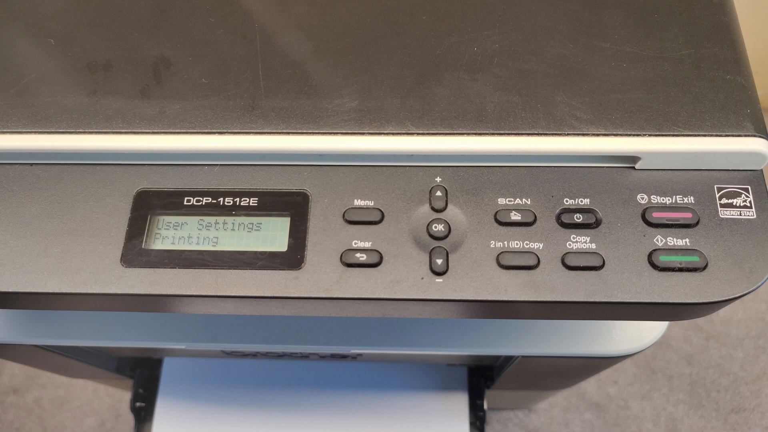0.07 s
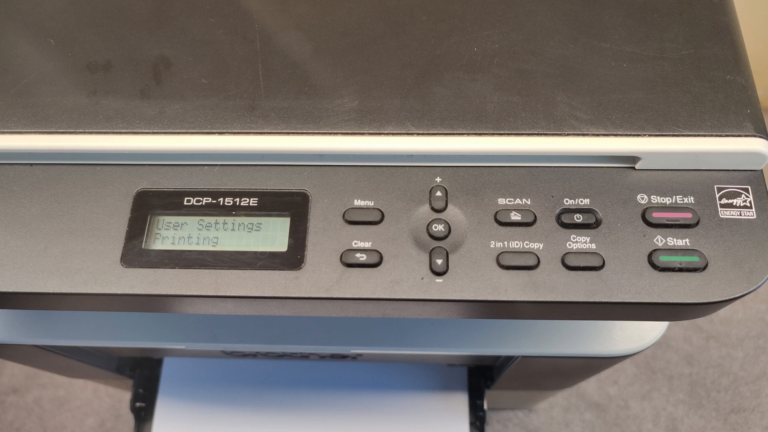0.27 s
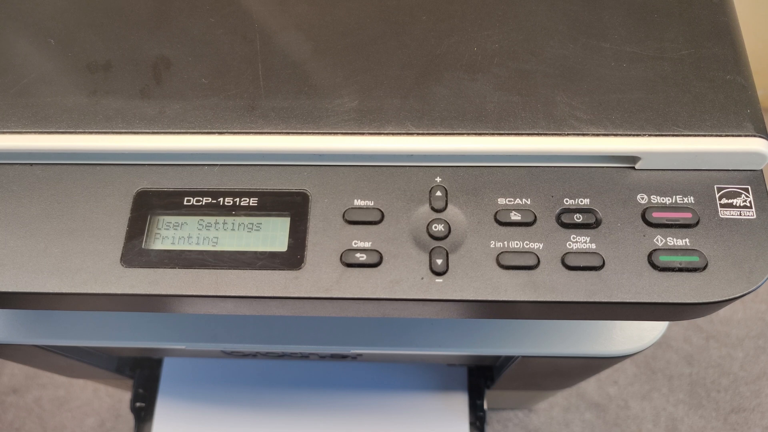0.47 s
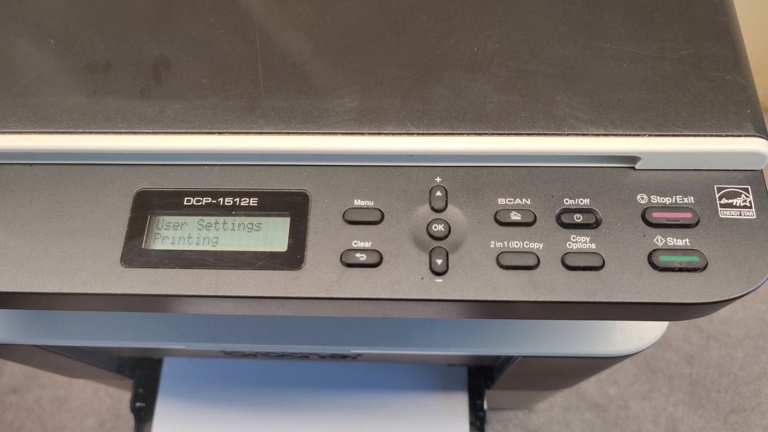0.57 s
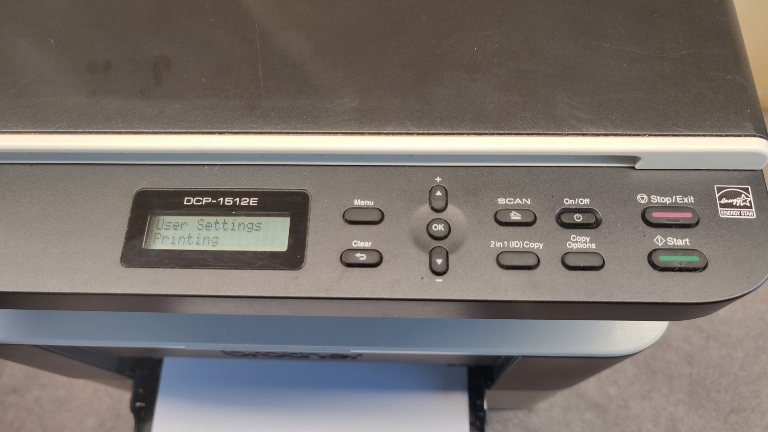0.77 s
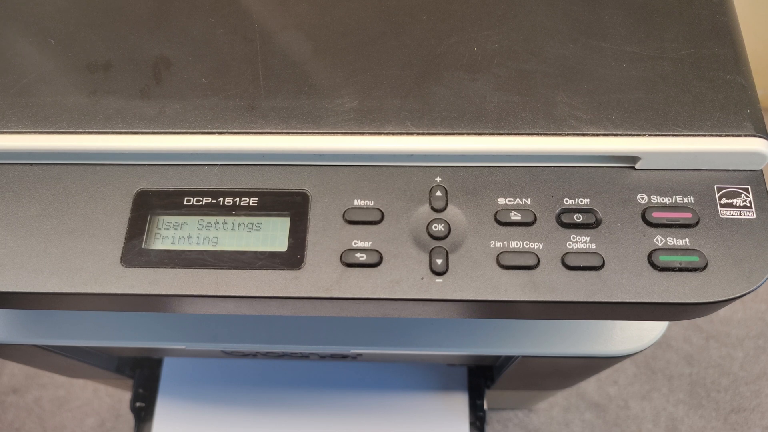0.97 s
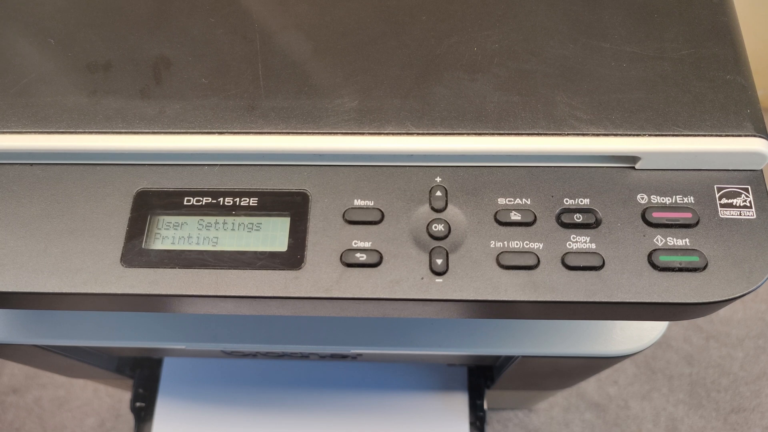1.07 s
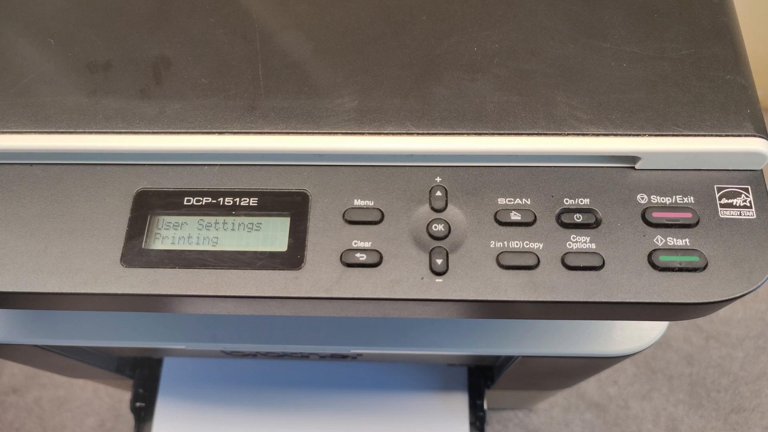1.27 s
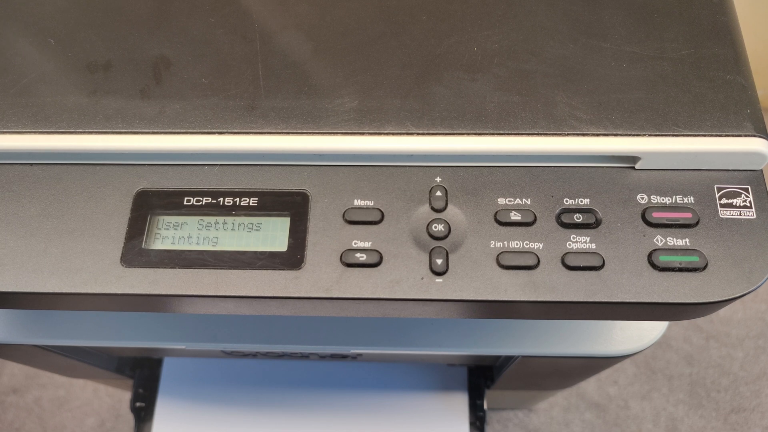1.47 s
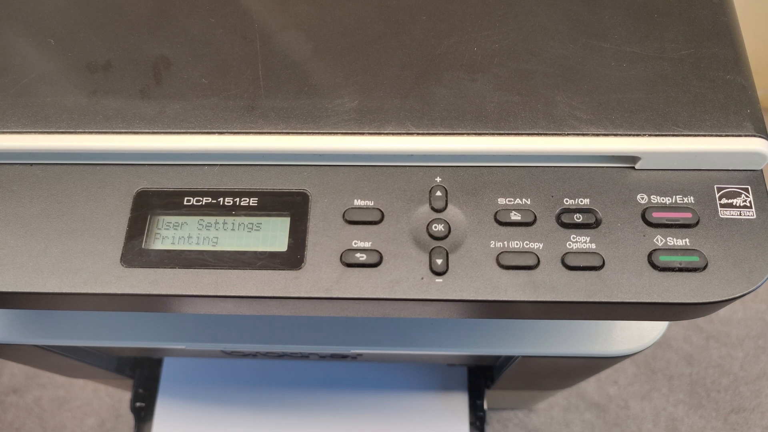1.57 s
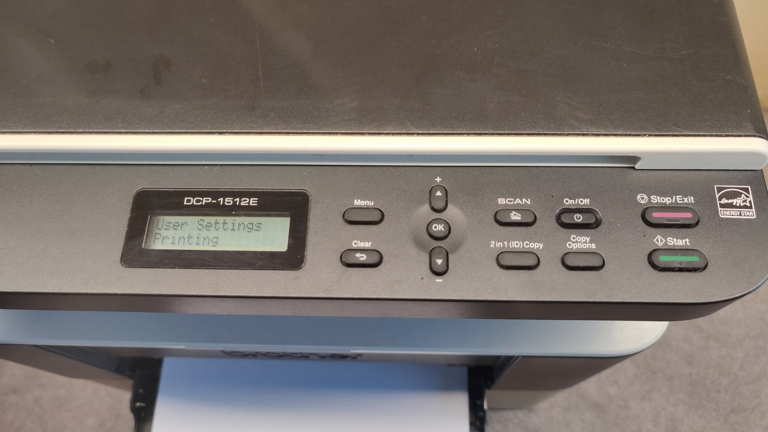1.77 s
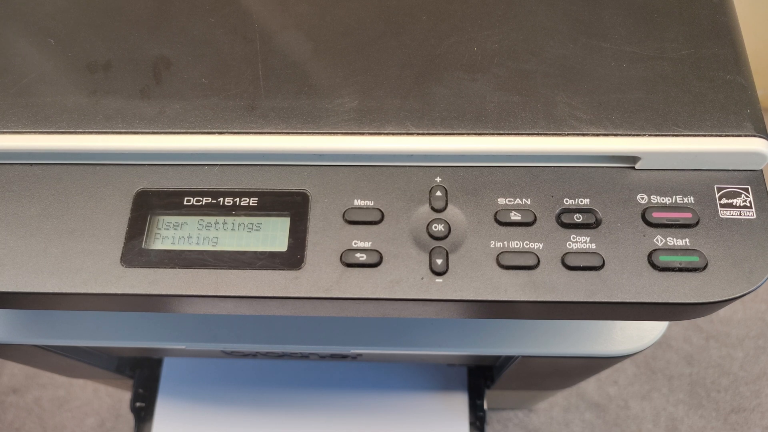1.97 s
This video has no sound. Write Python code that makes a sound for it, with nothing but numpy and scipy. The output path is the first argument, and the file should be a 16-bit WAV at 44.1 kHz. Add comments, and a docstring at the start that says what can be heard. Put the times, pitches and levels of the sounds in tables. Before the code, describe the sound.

After a brief quiet, a printer's mechanism clacks with soft low thuds, and its motor and gears quickly reach a wavering, surging whirr with papery roller rustle; a faint rising whine passes. Close stereo, small dry space.

```python
"""A quiet room, with the stereo microphone just above the panel of a laser printer as it wakes.
The drive engages with a plastic clack: noise cracks, ringing case modes and soft chassis thuds.
Its gears run up to a whirr of wavering, surging partials over the noise of rustling rollers.
Faintly behind, the mirror motor spins up in raspy partials that climb and fade out."""
import sys
import numpy as np
from scipy import signal
from scipy.fft import rfft, irfft
from scipy.io import wavfile

SR = 44100
rng = np.random.default_rng(int(sys.argv[2]) if len(sys.argv) > 2 else 0)


def to_wav(s):
    """Save 16-bit WAV."""
    ch = np.atleast_2d(s).T  # columns
    pcm = np.round(np.clip(ch, -1, 1) * 32767)  # PCM
    wavfile.write(sys.argv[1], SR, pcm.astype(np.int16))


N = 88552
T = np.arange(N) / SR
EDGE_HZ = 15480  # upper band limit of the recorder


def amp(db):
    """Decibels to gain."""
    return 10 ** (np.asarray(db) / 20)


def unit(x):
    """Scales to rms 1."""
    return x / np.sqrt(np.mean(abs(x) ** 2) + 1e-20)


def read(points, hz):
    """Reads a table on a log-frequency axis."""
    f, value = np.transpose(points)
    return np.interp(np.log(hz + 1), np.log(f + 1), value)


def curve(points, axis=1):
    """Reads one column of a table over time."""
    rows = np.array(points)
    return np.interp(T, rows[:, 0], rows[:, axis])


def drift(rate_hz):
    """Random wander of rms 1, weakening above the given rate."""
    f = np.fft.rfftfreq(N, 1 / SR)
    slowing = (f > 0) / (1 + (f / rate_hz) ** 2)
    return unit(irfft(rfft(rng.standard_normal(N)) * slowing, N))


# likeness of the two microphone sides: (frequency [Hz], left-right correlation [-1 to 1])
SIDE_LIKENESS = [(40, .97), (150, 0.9), (300, 0.9), (600, 0.65), (1300, 0), (2500, 0.04), (5000, 0),
                 (14000, 0)]
# lean of the stereo image: (frequency [Hz], left minus right [dB])
SIDE_LEAN = [(60, -1), (200, 1.5), (380, -1.5), (620, 2.5), (1000, -3.5), (1400, 2.5), (2500, 0.5),
             (4400, -2), (7000, -3.5), (8600, 5), (11000, -3), (14300, 3)]


def colour(pair, spectrum):
    """Gives two unrelated signals a spectrum and a frequency-dependent stereo image, at rms 1."""
    f = np.fft.rfftfreq(N, 1 / SR)
    a, b = rfft(pair)
    same = np.clip(read(SIDE_LIKENESS, f), -.99, .99)
    lean = read(SIDE_LEAN, f)
    left = a * amp(lean / 2)
    right = (same * a + np.sqrt(1 - same ** 2) * b) * amp(-lean / 2)
    return unit(irfft(np.array([left, right]) * amp(read(spectrum, f)), N))


def noise(spectrum):
    """Steady stereo noise of rms 1."""
    return colour(rng.standard_normal((2, N)), spectrum)


# spectrum of the quiet room: (frequency [Hz], relative density [dB per Hz])
ROOM_SPECTRUM = [(10, -31), (22, -6.5), (38, -17), (60, -4.5), (90, -17), (178, -22.5), (270, -14.5),
                 (377, -30.5), (480, -22), (750, -27.5), (950, -32.5), (2500, -41), (8000, -54.5),
                 (15000, -52)]
ROOM_DB = -57.5


def room_tone():
    """The room itself: steady noise, heaviest in the lows."""
    return amp(ROOM_DB) * noise(ROOM_SPECTRUM)


# spin-up of the mirror motor: (time [s], whine frequency [Hz])
MIRROR_SPIN_UP = [(.63, 1300), (.67, 2320), (.68, 2560), (.73, 3990), (.8, 5950), (.854, 7270), (.95, 9240),
                  (1.06, 11290), (1.164, 13120), (1.29, 15290), (1.45, 17700)]
# partials of the whine: (multiple of a sixth of the whine, level [dB], whine frequency at half entry [Hz])
MIRROR_PARTIALS = [(3, -4.5, 12600), (6, 0, 1800), (8, -14, 9000), (9, -7, 8500), (12, -4, 5500)]
# passage through the case: (frequency [Hz], level [dB], left minus right [dB])
CASE_PASSAGE = [(1700, -59, 0), (2150, -65, 0), (2380, -53.5, 0), (2520, -49, 0), (2750, -64, 0),
                (3300, -70, 0), (3900, -61, -3), (4700, -63.5, -3), (5400, -62.5, -3), (6300, -65, -4),
                (7150, -59.5, -8), (7700, -72, -2), (8200, -72, 0), (9000, -78, 0), (10500, -78, 0),
                (12000, -71, 2), (13400, -69, 0), (14200, -59, 6), (14700, -69, 3), (15400, -74, 0)]


def mirror(rasp=0.91, rasp_hz=160, swell_hz=1000, fade_s=0.12):
    """The mirror motor accelerates; its raspy partials flare as they cross the resonances of the case."""
    whine_hz, case, out = curve(MIRROR_SPIN_UP), np.array(CASE_PASSAGE), np.zeros((2, N))
    half_lean = np.array([[.5], [-.5]])
    for k, db, from_hz in MIRROR_PARTIALS:
        hz = whine_hz * k / 6
        below_edge = np.clip((EDGE_HZ - hz) / 200, 0, 1)
        entered = np.clip((whine_hz - from_hz) / swell_hz + .5, 0, 1)
        level_db = db + read(case[:, :2], hz) + half_lean * read(case[:, ::2], hz)
        grit = np.array([unit(1 + rasp * (drift(rasp_hz) + 1j * drift(rasp_hz))) for _ in range(2)])
        partial = (grit * np.exp(2j * np.pi * np.cumsum(hz) / SR)).real
        out += np.sqrt(2) * below_edge * entered * amp(level_db) * partial
    return out * np.clip((MIRROR_SPIN_UP[-1][0] - T) / fade_s, 0, 1)


START_S = .41


def running(rise_s=0.0054):
    """Fades in linearly as the drive starts."""
    return np.clip((T - START_S) / rise_s, 0, 1)


# lumpy whirr of the gear train: (frequency [Hz], relative density [dB per Hz])
WHIRR_SPECTRUM = [(30, -2.5), (70, -26), (105, 2.5), (140, -9.5), (260, -4), (350, -10), (450, -8),
                  (560, -6.5), (640, -0.5), (745, -16.5), (900, -8.5), (1250, -9.5), (1750, -19.5),
                  (3000, -29), (8000, -78)]
# rustle of the rollers: (frequency [Hz], relative density [dB per Hz])
RUSTLE_SPECTRUM = [(300, -31), (1200, -3.5), (2300, 1), (3400, -2), (4500, -2.5), (6200, -7.5),
                   (7250, -6.5), (8100, -18), (10500, -19.5), (12800, -16), (14200, -9), (15400, -25)]
# course of the load: (time [s], whirr and shaft hum level [dB], rustle level [dB])
LOAD_LEVEL = [(.46, 1, -1.5), (.53, 0, -2.5), (.6, -3, 1), (.8, -1, -0.5), (1.05, -1.5, -1),
              (1.35, -0.5, 0.5), (1.6, -0.5, 3), (1.78, -1.5, 4), (1.87, 1.5, 5.5), (2.0, 0.5, 6)]
WHIRR_DB, RUSTLE_DB = -51.5, -58.5  # before the load curve


def rollers(ticks_per_s=700, tick_spread_db=1.5, tick_share=0.31, flicker_db=1.4):
    """A lumpy whirr from the gear train and a rustle of tiny slips on the rollers."""
    whirr_db = WHIRR_DB + curve(LOAD_LEVEL) + flicker_db * drift(36)
    whirr = noise(WHIRR_SPECTRUM) * amp(whirr_db)
    ticks = (rng.random((2, N)) < ticks_per_s / SR) * rng.choice([-1, 1], (2, N))
    ticks = unit(ticks * amp(tick_spread_db * np.minimum(rng.exponential(1, N), 4)))
    rustle = colour(rng.standard_normal((2, N)) + tick_share * ticks, RUSTLE_SPECTRUM)
    rustle_db = RUSTLE_DB + curve(LOAD_LEVEL, axis=2) + 1.0 * drift(56)
    return running() * (whirr + rustle * amp(rustle_db))


# soft chassis thuds: (time [s], half length to 1/e [s], frequency [Hz], level [dB])
CHASSIS_THUDS = [(.417, .009, 590, -47), (.432, .013, 325, -45), (.43, .02, 165, -54), (.432, .02, 95, -44)]


def lurch():
    """The chassis takes up the blow a moment later in soft, low thuds, alike on both sides."""
    out = np.zeros(N)
    for s, half_s, hz, db in CHASSIS_THUDS:
        swell = np.exp(-((T - s) / half_s) ** 2)
        out += amp(db) * swell * np.sin(2 * np.pi * hz * (T - s))
    return out


# one faint tick, then the blows as the drive engages: (time [s], relative level [dB])
BLOWS = [(0.217, -30.5), (0.386, -11.5), (0.394, -10.5), (0.4014, -2.5), (0.4031, 0), (0.408, -9),
         (.4165, -23), (.4315, -25)]
# ringing modes of the plastic case: (frequency [Hz], relative level [dB], time to fall 60 dB [s])
CASE_MODES = [(262, -12, .1), (560, -11, .08), (622, -7, .1), (712, -7.5, .08), (1014, -4, .07),
              (1130, -2, .09), (1215, -2.5, .08), (2112, -3.5, .09), (2220, -10, .07), (2487, -11, .08),
              (3268, -13, .07)]
# crack of each blow: (frequency [Hz], relative density [dB per Hz])
CRACK_SPECTRUM = [(60, -24), (150, -2), (260, -4), (500, -5), (1100, 1), (1600, -1.5), (2600, -4),
                  (4000, -12.5), (7000, -18.5), (9000, -29.5), (15000, -40)]
MODES_DB, CRACK_DB, BLOW_RISE_S = -39, -36.5, .002
CRACK_T60_S, TAIL_DB, TAIL_T60_S = 0.042, -6, 0.18  # tail level relative to the crack


def clack():
    """Each blow gives a crack with a short room tail and feeds the ringing modes of the plastic case."""
    ages = [(np.maximum(T - s, 0), db) for s, db in BLOWS]

    def decay(t60):
        """Summed energy of all blows, as an envelope."""
        energy = 0
        for age, db in ages:
            energy += (np.minimum(age / BLOW_RISE_S, 1) * amp(db - 60 * age / t60)) ** 2
        return np.sqrt(energy)

    ringing = np.zeros((2, N))
    for hz, db, t60 in CASE_MODES:
        # the two sides differ more in phase toward the treble
        phase = 2 * np.pi * rng.random() + rng.standard_normal((2, 1)) * min(hz / 2500, 1)
        ringing += amp(db) * decay(t60) * np.sin(2 * np.pi * hz * T + phase)
    crack = (decay(CRACK_T60_S) + amp(TAIL_DB) * decay(TAIL_T60_S)) * noise(CRACK_SPECTRUM)
    return amp(CRACK_DB) * crack + amp(MODES_DB) * ringing


def tone(turns, db, lean_db, lead, unsteady, flutter_hz=9):
    """One partial of a turning part, fluttering a little differently on each side."""
    flutter = unit(drift(flutter_hz) + 1j * drift(flutter_hz))
    own = np.array([unit(drift(25) + 1j * drift(65)) for _ in range(2)])
    sides = np.array([[amp(lean_db / 2) * np.exp(1j * lead)], [amp(-lean_db / 2)]])
    wavering = sides * unit(1 + unsteady * (0.83 * flutter + 0.76 * own))
    return np.sqrt(2) * amp(db) * (wavering * np.exp(2j * np.pi * turns)).real


# first gear mesh tone: (time [s], level relative to GEAR_DB [dB])
FIRST_MESH_LEVEL = [(.45, 4), (.53, -4), (.6, -9), (.69, 4.5), (.75, 5), (.82, -4.5), (.9, 0), (.95, 7),
                    (1.0, -7.5), (1.13, 5), (1.18, -5), (1.26, -1.5), (1.34, 4.5), (1.39, -3), (1.51, 3.5),
                    (1.58, -5), (1.63, 1), (1.675, -0.5), (1.72, 2), (1.77, -1.5), (1.91, 2), (2.0, -3)]
# second gear mesh tone: (time [s], level [dB])
SECOND_MESH_LEVEL = [(.45, -49.5), (.485, -60), (.515, -52.5), (.545, -58.5), (.58, -56), (.68, -60),
                     (.85, -57), (1.0, -61), (1.28, -59), (1.45, -60), (2.0, -63.5)]
# third gear mesh tone, which flares during the run-up: (time [s], level [dB])
THIRD_MESH_LEVEL = [(.45, -78), (.53, -72), (.565, -58), (.595, -60.5), (.63, -69.5), (2.0, -67)]
# ringing fourth gear mesh tone: (time [s], level [dB])
FOURTH_MESH_LEVEL = [(.45, -70), (.645, -65), (.69, -56), (.73, -61), (.78, -59), (.83, -60.5), (.865, -74),
                     (.93, -56.5), (1.04, -62.5), (1.14, -54.5), (1.21, -67), (1.29, -59.5), (1.36, -54.5),
                     (1.41, -63.5), (1.45, -58.5), (1.53, -65.5), (1.63, -59.5), (1.69, -60), (1.77, -55),
                     (1.85, -70.5), (1.92, -56), (2.0, -59.5)]
# upper mesh tones: (multiple of MESH_HZ, level [dB], left minus right [dB], left leads [rad], unsteadiness [0-1])
MESH_OVERTONES = [(6, -76, 2, 0.49, 1), (7, -74, 7.5, 0.66, 1)]
# motor shaft: (multiple of HUM_HZ, level [dB], left minus right [dB], left leads [rad], unsteadiness [0-1])
SHAFT_HUM = [(1, -68.5, -0.36, 0.068, 1), (2, -61.5, -0.4, 0.039, 0.1), (3, -63.5, 0.62, 0, 0.19),
             (4, -66, 0, 0.094, 0.45), (5, -64.5, 0.32, 0.1, 0.15), (6, -70, -0.64, 0.094, 0.71),
             (7, -66, 0, 0, 0.27)]
# idler gears: (frequency [Hz], level [dB], left minus right [dB], left leads [rad], unsteadiness [0-1])
IDLER_TONES = [(121, -65, 0, 0, .5), (593, -58.5, 6, .4, .35), (632, -67, 2, .2, .7), (790, -72, 2, 0, .4),
               (828, -72, 0, 0, .5), (883, -71, 0, 0, .7), (912, -71, 2, 0, .6), (1380, -75, 0, 0, .7)]
# idler gears and surging tone together: (time [s], relative level [dB])
IDLER_SURGE_LEVEL = [(.46, -10), (.54, -1), (.75, -4.5), (1.05, -2.5), (1.25, -3), (1.7, 1.5), (1.93, 2),
                     (2.0, -1.5)]
START_SHORT, SPIN_UP_S = .15, .075  # fraction of speed missing at the start, time constant
MESH_HZ, HUM_HZ, GEAR_DB, GEAR_RISE_S = 475.2, 52.0, -53.5, 0.046
SPEED_WANDER = 0.0025  # rms fraction of the motor speed
SWAY_HZ, SWAY_DEPTH = 5.6, 0.0025  # rate and peak fraction of speed
# an off-centre gear goes slack once a turn: its pitch, its turn and one moment of slack
SURGE_HZ, TURN_S, SLACK_S, SURGE_DB = 558, .155, 1.07, -53.5


def drive():
    """Shaft and gear tones locked to one motor speed; off-centre gears sway the mesh and surge one tone."""
    shortfall = START_SHORT * np.exp(-np.maximum(T - START_S, 0) / SPIN_UP_S)
    speed = 1 - shortfall + SPEED_WANDER * drift(9.2)
    travel = np.cumsum(speed) / SR
    swayed = travel + np.cumsum(SWAY_DEPTH * np.sin(2 * np.pi * SWAY_HZ * T)) / SR
    mesh = tone(MESH_HZ * swayed, GEAR_DB + curve(FIRST_MESH_LEVEL),
                lean_db=-5.5, lead=1.46, unsteady=0.31, flutter_hz=23.4)
    mesh += tone(2 * MESH_HZ * swayed, curve(SECOND_MESH_LEVEL),
                 lean_db=9.5, lead=1.59, unsteady=0.42, flutter_hz=28)
    mesh += tone(3 * MESH_HZ * swayed, curve(THIRD_MESH_LEVEL),
                 lean_db=-11, lead=0, unsteady=1.0, flutter_hz=31)
    # the fourth follows the motor without the sway
    mesh += tone(4 * MESH_HZ * travel, curve(FOURTH_MESH_LEVEL),
                 lean_db=0.0, lead=-0.78, unsteady=0.22, flutter_hz=22)
    mesh += sum(tone(k * MESH_HZ * swayed, *row) for k, *row in MESH_OVERTONES)
    hum = sum(tone(k * HUM_HZ * travel, *row) for k, *row in SHAFT_HUM) * amp(curve(LOAD_LEVEL))
    idlers = sum(tone(hz * travel, *row) for hz, *row in IDLER_TONES)
    contact = abs(np.sin(np.pi * (T - SLACK_S) / TURN_S))
    surge = contact * tone(SURGE_HZ * travel, SURGE_DB,
                           lean_db=3.5, lead=0.23, unsteady=0.48, flutter_hz=23)
    tones = mesh + hum + (idlers + surge) * amp(curve(IDLER_SURGE_LEVEL))
    return running(rise_s=GEAR_RISE_S) ** .5 * tones


def scene():
    """The room first, then the printer close below the microphone."""
    return room_tone() + mirror() + rollers() + lurch() + clack() + drive()


def record(dry):
    """The band limit of the recorder, a steep low-pass."""
    low_pass = signal.firwin(511, EDGE_HZ, window=("kaiser", 9), fs=SR)
    return signal.oaconvolve(dry, low_pass[None], "same")


dry = scene()
out = record(dry)
to_wav(out)
```